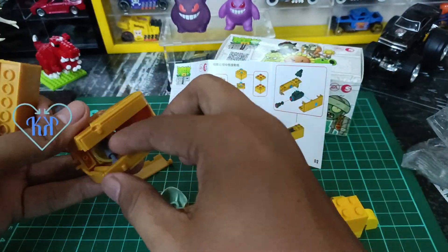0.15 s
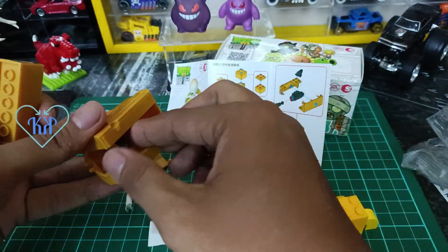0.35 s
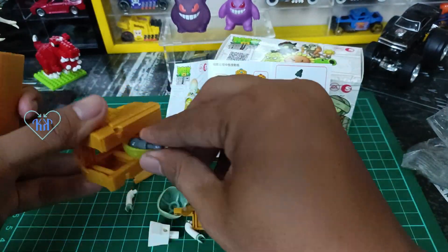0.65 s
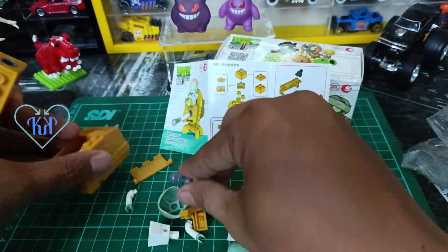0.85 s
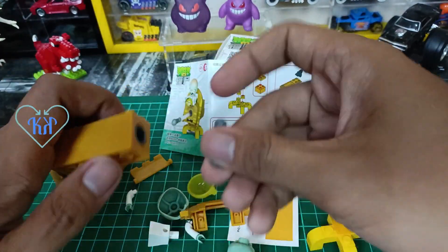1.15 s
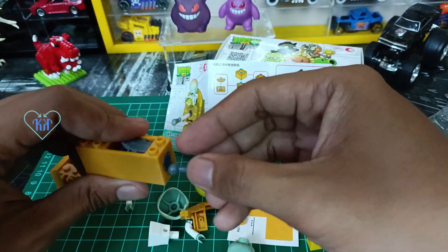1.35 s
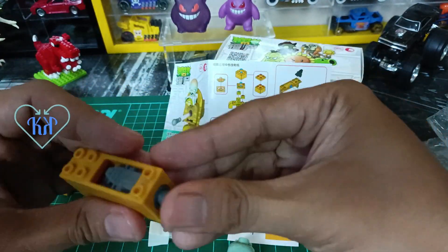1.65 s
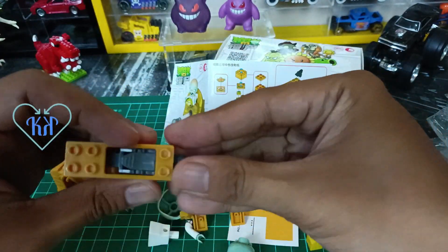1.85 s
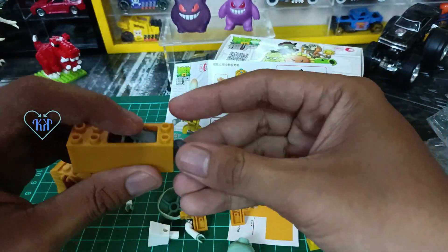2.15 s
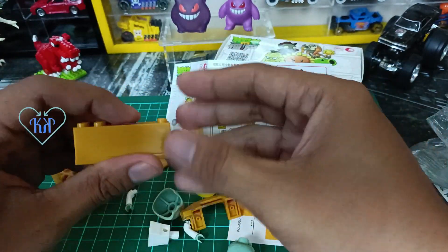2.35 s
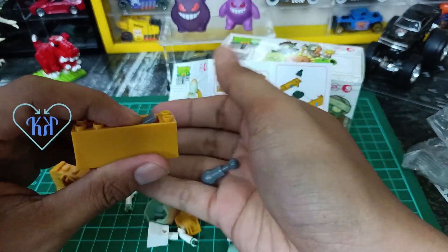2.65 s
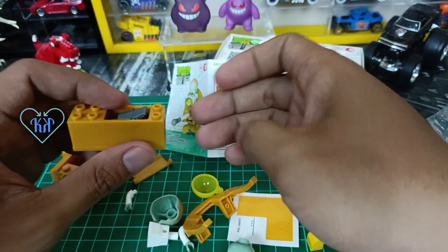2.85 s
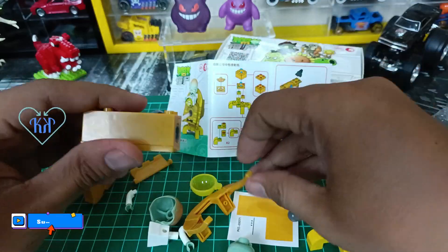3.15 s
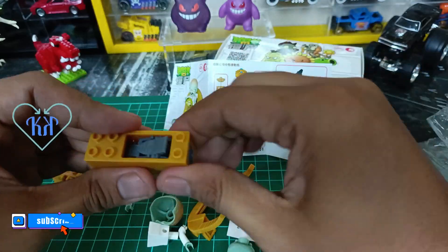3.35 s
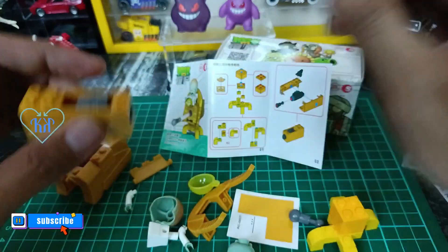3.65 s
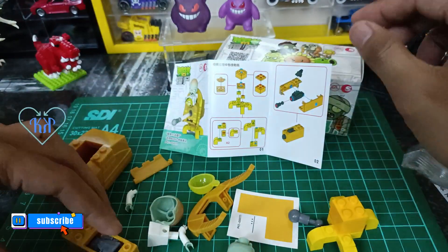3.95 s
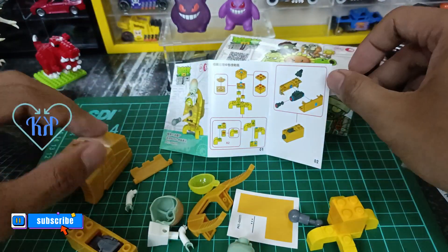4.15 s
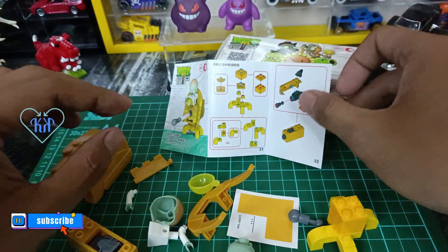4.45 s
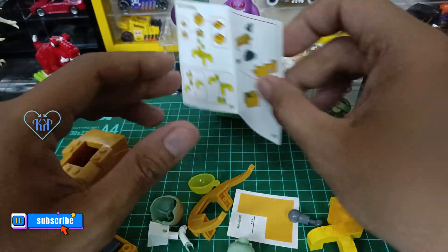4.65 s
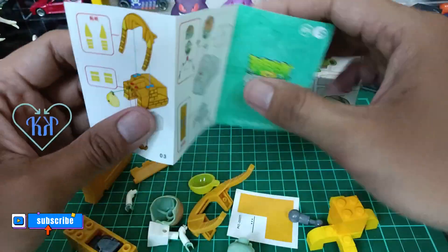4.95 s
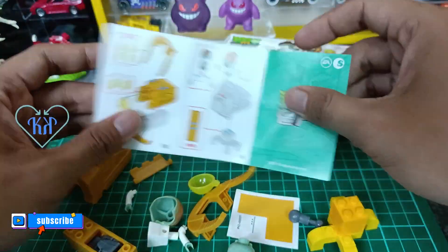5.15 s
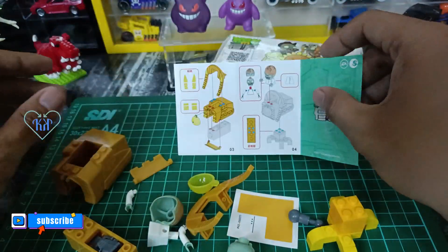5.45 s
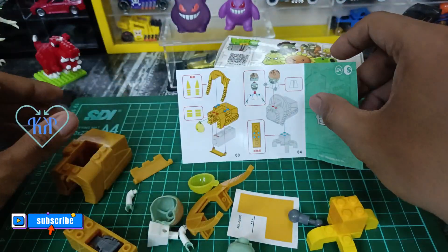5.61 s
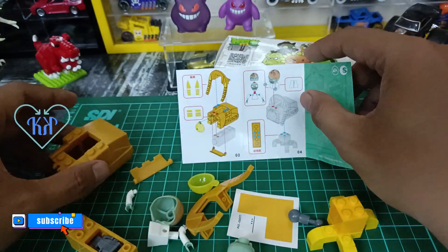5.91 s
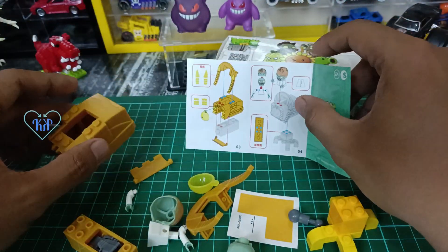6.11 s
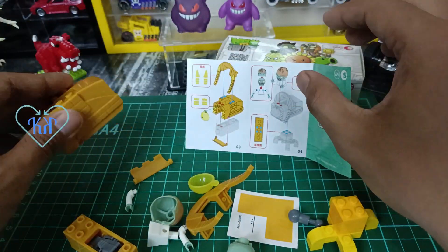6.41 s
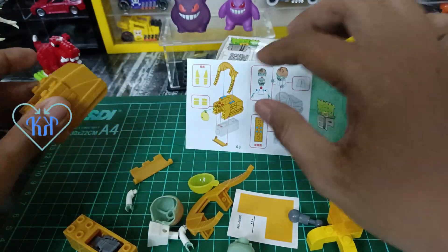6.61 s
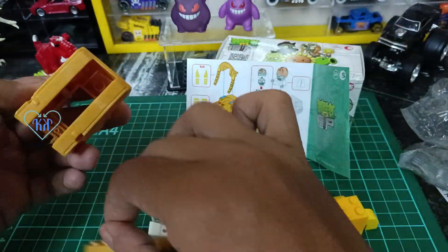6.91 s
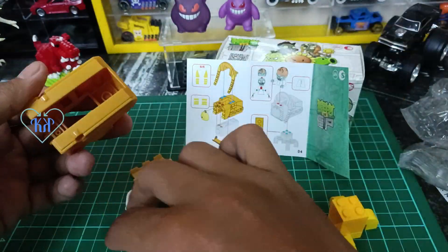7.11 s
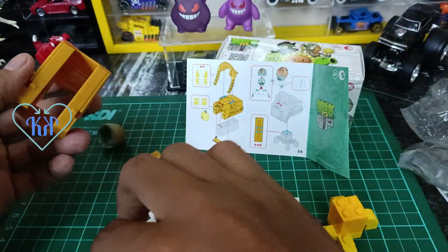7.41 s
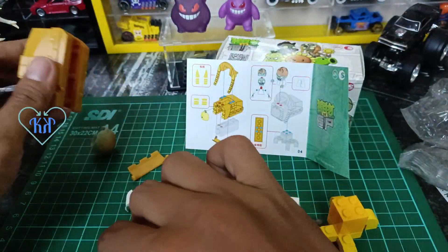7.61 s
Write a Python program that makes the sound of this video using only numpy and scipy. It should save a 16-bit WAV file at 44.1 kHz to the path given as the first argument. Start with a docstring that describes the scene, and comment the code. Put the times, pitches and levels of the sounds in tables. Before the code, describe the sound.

Dry, bright plastic clicks come in irregular groups, with short room echo. First hollow ticks, then a double knock on the table, light part touches, a crisp snap, faint squeaks and edge scrapes. A folded instruction sheet flicks and crackles. Dull room hiss swells with each louder sound and sinks to near silence. Finally knocks, ticks, scrapes and deep stand bumps crowd together.

```python
"""Plastic building bricks are fitted by hand at a table in a small room, close to a phone on a stand.
First pegs tick and rattle in hollow bricks; then parts knock on the table and touch, and pegs snap home
with faint squeaks. Next edges scrape and a stiff leaflet flicks open; near the end the handling thickens
and an arm rubs the stand so that it booms. Contacts are bursts of tiny slips ringing each body's
resonances; a noise suppressor lets the room noise up with loud sound, then fades it out again."""
import sys
import numpy as np
from scipy import signal
from scipy.io import wavfile
from scipy.ndimage import uniform_filter1d, minimum_filter1d

SR = 44100
rng = np.random.default_rng(int(sys.argv[2]) if len(sys.argv) > 2 else 0)


def unload_audio(sound):
    """Save the sound as a 16-bit wav file, at the path given as the first command line argument."""
    columns = np.transpose(np.atleast_2d(sound))
    # keep every value between -1 and 1, then stretch to whole-number steps
    steps = np.round(np.clip(columns, -1, 1) * 32767)
    wavfile.write(sys.argv[1], SR, steps.astype(np.int16))


N = 342657
T = np.arange(N) / SR  # time in seconds

# In every contact table, level is in dB before the gain of that kind of contact;
# lows and treble are in dB against the middle band.

# Spectrum of the room's air. Each row: frequency in Hz, relative density in dB.
ROOM_NOISE = [(25, -23), (55, -9), (100, 7.5), (160, -3), (280, -10), (500, -14.5), (1000, -19),
              (2200, -18), (3300, -28), (5200, -37.5), (15000, -57.5)]
# A very faint buzz under everything. Each row: frequency in Hz, rms level in dB.
BUZZ = [(48.4, -82.5), (91.5, -81), (140.0, -87), (328.4, -92)]

# A peg ticks inside a hollow brick. Each row: start in seconds, level in dB, treble in dB.
BRICK_TICKS = [(0.025, -18.5, -21), (0.071, 5, -17.5), (0.101, -13, -23), (0.158, -23, -25.5),
               (0.196, -2, -10.5), (0.203, -6, -12.5), (0.244, -11, -27), (0.435, 4, -10.5),
               (0.548, -21, -16.5), (0.695, -41, -28), (1.707, 1, -15)]
# The peg then rattles in its hole. Each row: delay in seconds, level against the tick in dB.
RATTLE = [(0.0095, -12), (0.025, -17.5)]
RATTLE_TREBLE_DB, BRICK_LOWS_DB = -11.5, -29.5  # rattle treble is against the tick's
# Length of a light touch: at level 0 dB, and the change per dB.
TOUCH_MS, TOUCH_MS_PER_DB = 1.3, 0.02

# A part lands on one edge, then falls flat. Each row: start in seconds, level in dB,
# fall against landing in dB, lows of the landing in dB, treble in dB.
KNOCKS = [(0.8817, -1.5, -0.5, 0, -15.5), (0.8994, -9.5, 8.5, 4, -11.5), (0.9788, -18, 1.5, 2.5, -22),
          (3.9864, -20, -3.5, 1.5, -16.5), (4.0315, -22.5, -23, -4, -49), (6.9594, -15, -1, 13.5, -12),
          (6.9783, -5.5, -6, -1.5, -14), (7.004, -5, -4, -18, -17), (7.286, -3.5, -11, -7, -15),
          (7.3412, -2.5, -29, -7, -19), (7.4349, -4.5, -12, 4, -21.5), (7.662, -15.5, 4.5, 3, -14)]
FALL_FLAT_S, LANDING_MS, FALL_MS = 0.0082, 2.9, 2.2

# Bumps on the table and the stand. Each row: time in seconds, level in dB before pulse shape and filters.
BUMPS = [(0.984, -16), (2.607, -22), (3.224, -18), (4.01, -28.5), (7.136, -9.5), (7.281, -4.5), (7.317, 0),
         (7.481, -3.5), (7.649, -2)]
# An arm rubs the stand; level runs straight between rows.
# Each row: time in seconds, rms level in dB before the filters.
RUB = [(6.98, -42), (7.378, -13.5), (7.43, -24.5), (7.46, -12), (7.592, -20.5), (7.716, -8), (7.77, -23)]

# Small parts touch each other. Each row: start in seconds, level in dB, treble in dB.
PART_TICKS = [(1.006, -38, 4.5), (1.0883, -38, -65), (1.438, -23.5, -13), (1.535, -20.5, -8.5),
              (1.5901, -33, -25), (6.96, -4, -13), (7.1841, -32.5, 0), (7.2449, -1.5, -31),
              (7.254, -1, -44)]
PART_LOWS_DB = -14

# Fingers and parts rustle between contacts. Each row: start of the hold in seconds, hold in seconds,
# level in dB before the rustle gain.
RUSTLES = [(1.45, 0.17, -48), (1.98, 0.33, -61), (2.63, 0.046, -42), (5.102, 0.02, -29), (7.1, 0.7, -44.5),
           (7.27, 0.057, -27)]
RUSTLE_RISE_DB_PER_S, RUSTLE_FALL_DB_PER_S = 597.5, 219

# The peg snaps home. Each row: start in seconds, level in dB, treble in dB, length in ms.
PEG_SNAPS = [(1.708, -12, 16, 1.13), (2.562, -6, 11, 0.79), (2.572, -5.5, 5, 3.1), (2.585, -6.5, -5, 3)]
PEG_LOWS_DB = -27

# Twisted plastic squeaks faintly. Each row: peak time in seconds, mean pitch in Hz,
# level of the fundamental at the peak in dB.
SQUEAKS = [(2.004, 705, -36.5), (2.056, 1480, -48.5), (2.628, 4627, -39.5), (2.655, 1822, -42),
           (2.838, 1200, -51.5)]
SQUEAK_RISE_DB_PER_S, SQUEAK_FALL_DB_PER_S = 800, 360

# Edges scrape over each other in a run of catches. Each row: start in seconds, level in dB,
# lows in dB, treble in dB, fade per catch in dB.
SCRAPES = [(3.1805, -5.5, -9, -26, 5), (3.1885, 6, -14.5, -26, 4), (3.2328, -2.5, -3.5, -16.5, 9),
           (7.074, -7, -10, -14.5, 3.5), (7.3275, -0.5, -8, -13.5, 10), (7.648, -9.5, -2.5, -19, 1.5),
           (7.675, -12.5, -1, -19, 4.5)]
CATCH_GAP_S, CATCH_MS = 0.011, 4.83

# The stiff leaflet buckles in a run of crackles. Each row: start in seconds, level in dB,
# lows in dB, treble in dB, fade per crackle in dB (below zero it grows).
LEAFLET_FLICKS = [(4.768, -38.5, -12.5, -15, -1), (4.8455, -17, -12.5, -18.5, -1),
                  (4.8621, -3.5, -38, -20, 10), (4.907, -13.5, -24.5, -17.5, 15),
                  (5.0605, -0.5, -3.5, -23, 0.8), (5.1921, -22.5, -22, -22, 3.5),
                  (5.2878, -34, 4, -15.5, -2)]
CRACKLE_GAP_S, CRACKLE_MS = 0.0092, 1.29

# Resonances of each thing. Each row: frequency in Hz, width in Hz before damping, gain in dB.
BRICK = [(2373, 170, -7), (2628, 130, 0.5), (2751, 76, -14), (3170, 150, -16.5), (5090, 270, -18.5),
         (5670, 100, -18), (7743, 1100, -27.5), (9050, 1000, -23), (9780, 160, -27)]
TABLE = [(272, 310, -8.5), (395, 80, 5), (630, 71, -0.5), (825, 83, 0), (1075, 210, -0.5), (1300, 110, -1),
         (1396, 56, -3.5), (1810, 100, -3), (2468, 99, 0.5), (3110, 170, -6), (4170, 97, -18),
         (4637, 93, -14), (7200, 500, -17), (9480, 150, -19.5), (14500, 600, -23.5)]
STAND = [(124.2, 6.6, 7), (83, 51, -11), (163.7, 34.5, -14.5)]
PART = [(2484, 28, 3.5), (3320, 50, -9), (4050, 150, -10.5), (4811, 170, 0.5), (5418, 170, -5),
        (6280, 180, -10.5), (9620, 250, -27.5)]
EDGE = [(1730, 140, -10), (2159, 100, 3.5), (2400, 190, -3.5), (2950, 76, 0), (3370, 210, -9.5),
        (3790, 73, -2.5), (5300, 376, -56.5), (6420, 210, -7), (9400, 150, -7.5)]
PEG = [(1310, 53, -1), (4560, 86, 6), (7590, 36, -7), (8390, 100, -1), (9630, 12, -12), (11500, 89, -2),
       (13500, 190, -12), (14400, 47, -6.5), (13900, 30, -0.5)]
LEAFLET = [(257, 270, 5), (534.5, 128, 7.5), (872, 225, 5), (1050, 187, 6), (1676, 114, 0.5),
           (2120, 160, 1), (2615, 180, 0.5), (3320, 120, -1), (3878, 153, -7.5), (4980, 320, -35),
           (8100, 500, -24.5), (13670, 960, -27.5)]

TOP_HZ = 15800  # the phone passes nothing much above this


def undb(db):
    """Decibels to gain."""
    return 10 ** (np.asarray(db) / 20)


def unit(x):
    """Scale to unit energy."""
    return x / np.sqrt(np.sum(x ** 2) + 1e-20)


def curve(rows, column):
    """One column of a table, joined by straight lines in time."""
    rows = np.array(rows)
    return np.interp(T, rows[:, 0], rows[:, column])


def during(rows):
    """1 while a curve lasts, with soft ends."""
    inside = (T > rows[0][0]) & (T < rows[-1][0] + .02)
    return uniform_filter1d(1. * inside, size=600)


def swell(s, hold, db, rise, fall):
    """Gain that rises to db at time s, holds, and falls; slopes in dB a second."""
    before, after = np.maximum(s - T, 0), np.maximum(T - s - hold, 0)
    return undb(np.maximum(db - rise * before - fall * after, -200))


def add(track, s, x):
    """Mix x into the track at time s."""
    i = max(int(s * SR), 0)
    track[i:i + len(x)] += x[:N - i]


def band(x, hz, kind, order=3):
    """Butterworth filter."""
    return signal.sosfilt(signal.butter(order, hz, kind, fs=SR, output="sos"), x)


def ring(x, modes, damping=1):
    """A body's resonances in parallel, with alternating sign; damping by the fingers widens them."""
    total = 0
    for k, (hz, width, db) in enumerate(modes):
        q = max(hz / (width * damping), 1)
        b, a = signal.iirpeak(min(hz, .45 * SR), q, SR)
        total = total + (-1) ** k * undb(db) * signal.lfilter(b, a, x)
    return total


def contacts(events, modes, damping, crack_db, tick_db, brush_db, bright_hz, gain_db):
    """Each contact is a tick and a short swell of tiny slips; the body rings and the surface cracks."""
    track = np.zeros(N)
    t = np.arange(-SR // 140, SR // 14) / SR
    for s, db, low_db, high_db, ms in events:
        length = max(ms, .2) / 1000
        # the surfaces brush for a moment around the meeting
        brush = undb(brush_db) * np.exp(-np.abs(t) / .0018)
        grip = brush + np.maximum(t, 0) / length * np.exp(-np.abs(t) / length)
        slips = rng.standard_normal(len(t)) * undb(2.9 * rng.standard_normal(len(t))) * grip
        force = undb(tick_db) * (t == 0) + unit(slips)
        # the crack is the force heard directly, beside the ringing
        x = ring(force, modes, damping) + undb(crack_db) * force
        low = band(x, [190, 1400], "band")
        mid = band(x, [1500, 6000], "band")
        high = band(x, 6300, "high")
        # the stronger a contact's treble, the higher it reaches
        reach_hz = np.clip(bright_hz * 2 ** ((db + high_db) / 45), 5000, .45 * SR)
        high = band(high, reach_hz, "low", order=2)
        x = unit(mid) + undb(low_db) * unit(low) + undb(high_db) * unit(high)
        # longer contacts carry more energy
        add(track, s + t[0], x * undb(db + gain_db) * np.sqrt(SR * (length + 0.0015)))
    return track


def touch_ms(db):
    """The lighter a touch, the shorter it lasts."""
    return TOUCH_MS + TOUCH_MS_PER_DB * db


def stutter(events, gap_s, ms, count=3):
    """Strain lets go in a quick, even run of contacts whose level steps by the fade."""
    return [(s + k * gap_s, db - k * fade_db, lows_db, treble_db, ms)
            for s, db, lows_db, treble_db, fade_db in events for k in range(count)]


def room_noise(waver_db=4):
    """Air noise of the room, rms 1; narrow bands of it above 300 Hz waver."""
    hz, db = np.transpose(ROOM_NOISE)
    f, _, frames = signal.stft(rng.standard_normal(N), SR, nperseg=1024)
    f = f[:, None]
    # smooth chance over neighbouring bands, then over time
    waver = uniform_filter1d(rng.standard_normal(frames.shape), size=3, axis=0)
    waver = uniform_filter1d(waver, size=8, axis=1)
    spectrum_db = np.interp(np.log(f + 1), np.log(hz), db)
    gain = undb(spectrum_db + waver_db * waver / waver.std() * (f > 300))
    return unit(signal.istft(frames * gain, SR)[1][:N]) * np.sqrt(N)


def suppressed_noise(sound, open_db=-14, release_db=62, shut_db=-37, noise_db=-33, hiss_db=-68, start_db=-30):
    """The suppressor opens with the sound's level, sinks by at most release_db a second, and at last shuts."""
    power = band(band(sound, 370, "high") ** 2, 3.1, "low", order=1)
    level = 10 * np.log10(power + 1e-12)
    # hold the peaks of the level along a falling slope
    held = np.maximum.accumulate(np.maximum(level + release_db * T, start_db)) - release_db * T
    gain_db = np.minimum(held - open_db, 0)
    is_open = uniform_filter1d(1. * (gain_db > shut_db), size=500)
    hiss = undb(hiss_db + 0.11 * gain_db) * rng.standard_normal(N)
    return is_open * (undb(noise_db + gain_db) * room_noise() + hiss)


def buzz(rest_db=-86):
    """What is left in the silences: steady low sines and a trace of noise, mostly below 350 Hz."""
    lines = 0
    for hz, db in BUZZ:
        lines = lines + np.sqrt(2) * undb(db) * np.sin(2 * np.pi * (hz * T + rng.random()))
    rest = unit(band(rng.standard_normal(N), 350, "low", order=1)) * np.sqrt(N)
    return lines + undb(rest_db) * rest


def brick_ticks():
    """The peg strikes the wall of the brick, then rattles, weaker and duller."""
    hits = []
    for s, db, treble_db in BRICK_TICKS:
        hits.append((s, db, BRICK_LOWS_DB, treble_db, touch_ms(db)))
        for delay, drop_db in RATTLE:
            rattle_db = db + drop_db
            hits.append((s + delay, rattle_db, BRICK_LOWS_DB, treble_db + RATTLE_TREBLE_DB, touch_ms(rattle_db)))
    return contacts(hits, BRICK, damping=1.1, crack_db=-36.0, tick_db=-21, brush_db=-16,
                    bright_hz=17200, gain_db=-7.5)


def knocks():
    """Two blows to a knock, edge then face; the same weight gives both nearly the same thud."""
    hits = []
    for s, db, fall_db, lows_db, treble_db in KNOCKS:
        hits.append((s, db, lows_db, treble_db, LANDING_MS))
        hits.append((s + FALL_FLAT_S, db + fall_db, lows_db - fall_db, treble_db, FALL_MS))
    return contacts(hits, TABLE, damping=1.5, crack_db=-24.5, tick_db=-6.0, brush_db=-21.5,
                    bright_hz=19100, gain_db=-6.5)


def stand():
    """Each bump is one short low pulse; rubbing keeps the stand's low modes booming."""
    boom = signal.hilbert(ring(rng.standard_normal(N), STAND))
    # even out the boom so that the rub alone sets its level
    boom = boom.real / np.sqrt(uniform_filter1d(np.abs(boom) ** 2, size=1100) / 2)
    out = boom * undb(curve(RUB, 1)) * during(RUB)
    t = np.arange(SR // 10) / SR
    pulse = -np.sin(2 * np.pi * 115 * t) * (t / 0.0064) * np.exp(1 - t / 0.0043)
    for s, db in BUMPS:
        add(out, s - .004, undb(db) * pulse)
    return band(band(out, 100, "high", order=2), 2319, "low", order=2)


def part_ticks():
    """Small light parts touch once."""
    hits = [(s, db, PART_LOWS_DB, treble_db, touch_ms(db)) for s, db, treble_db in PART_TICKS]
    return contacts(hits, PART, damping=1.2, crack_db=-23.5, tick_db=-30, brush_db=-7.5,
                    bright_hz=16000, gain_db=-0.5)


def rustle(grain_db=5, waver_db=5, gain_db=-2):
    """Dense tiny slips keep the edges ringing, now one resonance and now another."""
    slips = rng.standard_normal(N) * undb(grain_db * rng.standard_normal(N))
    knots = np.arange(0, N / SR + .05, .04)
    x = 0
    for mode in EDGE[:5]:
        waver = np.interp(T, knots, rng.standard_normal(len(knots)))
        x = x + ring(slips, [mode]) * undb(waver_db * waver)
    x = unit(band(x, [900, 4000], "band")) * np.sqrt(N)
    swells = sum(swell(s, hold, db, RUSTLE_RISE_DB_PER_S, RUSTLE_FALL_DB_PER_S) for s, hold, db in RUSTLES)
    return x * undb(gain_db) * swells


def peg_snaps():
    """The peg jumps into its seat with hardly a brush before it: very little lows, strong treble."""
    hits = [(s, db, PEG_LOWS_DB, treble_db, ms) for s, db, treble_db, ms in PEG_SNAPS]
    return contacts(hits, PEG, damping=2.5, crack_db=-9, tick_db=-9.5, brush_db=-44.5,
                    bright_hz=22000, gain_db=-6)


def squeaks(overtone_db=-26, waver=0.02):
    """Plastic sticks and slips at a nearly steady rate; each squeak swells and dies."""
    chance = uniform_filter1d(rng.standard_normal(N), size=225) * np.sqrt(225)
    turns = 2 * np.pi * np.cumsum(1 + waver * chance) / SR  # phase of a wavering 1 Hz
    out = 0
    for s, hz, db in SQUEAKS:
        phase = hz * turns
        overtones = np.sin(2 * phase) + .5 * np.sin(3 * phase)
        tone = np.sin(phase) + undb(overtone_db) * overtones
        out = out + np.sqrt(2) * tone * swell(s, 0, db, SQUEAK_RISE_DB_PER_S, SQUEAK_FALL_DB_PER_S)
    return out


def scrapes():
    """One edge catches and slips along another, each catch weaker than the last."""
    hits = stutter(SCRAPES, CATCH_GAP_S, CATCH_MS)
    return contacts(hits, EDGE, damping=2.16, crack_db=-16.0, tick_db=-19.0, brush_db=11,
                    bright_hz=15800, gain_db=-14.5)


def leaflet():
    """The folds of stiff paper give way one after another."""
    hits = stutter(LEAFLET_FLICKS, CRACKLE_GAP_S, CRACKLE_MS)
    return contacts(hits, LEAFLET, damping=1.26, crack_db=-18, tick_db=-26, brush_db=-12.5,
                    bright_hz=22500, gain_db=-6.5)


def room(x, near_db, near_t60, far_db=-18, far_t60=0.41, far_hz=2600):
    """Dense quick echoes off table and shelves, then a dull longer tail; decay times in seconds."""
    t = np.arange(SR) / SR
    near = rng.standard_normal(SR) * undb(-60 * t / near_t60) * (1 - np.exp(-(t / 0.0071) ** 2))
    far = band(rng.standard_normal(SR), far_hz, "low") * undb(-60 * t / far_t60) * (1 - np.exp(-t / 0.0073))
    # the tail is scaled down for its narrower band
    echoes = undb(near_db) * unit(near) + undb(far_db) * unit(far) * np.sqrt(2 * far_hz / SR)
    return x + signal.fftconvolve(x, echoes)[:N]


def scene():
    """All the handling in its room; what is held near the phone sounds drier than the table."""
    held = brick_ticks() + part_ticks() + leaflet()
    away = peg_snaps() + scrapes() + knocks()
    sound = room(held, near_db=-9.5, near_t60=0.15) + room(away, near_db=-6.0, near_t60=0.135)
    # these reach the microphone without the room's echoes
    sound = sound + rustle() + stand() + squeaks()
    return (sound + suppressed_noise(sound) + buzz())[None]


def record(dry, ceiling=1.0):
    """A fast limiter holds the loudest peaks down; the phone cuts the top."""
    need = np.minimum(1, ceiling / (np.abs(dry) + 1e-9))
    gain = uniform_filter1d(minimum_filter1d(need, size=25), size=25)
    return signal.sosfilt(signal.ellip(10, .2, 85, TOP_HZ, fs=SR, output="sos"), dry * gain)


dry = scene()
out = record(dry)
unload_audio(out)
```